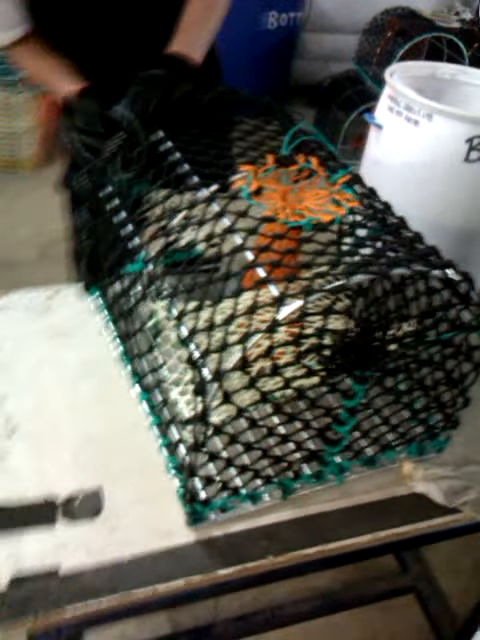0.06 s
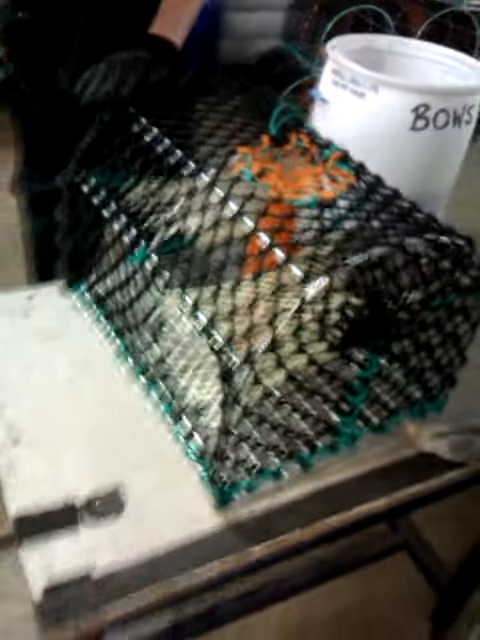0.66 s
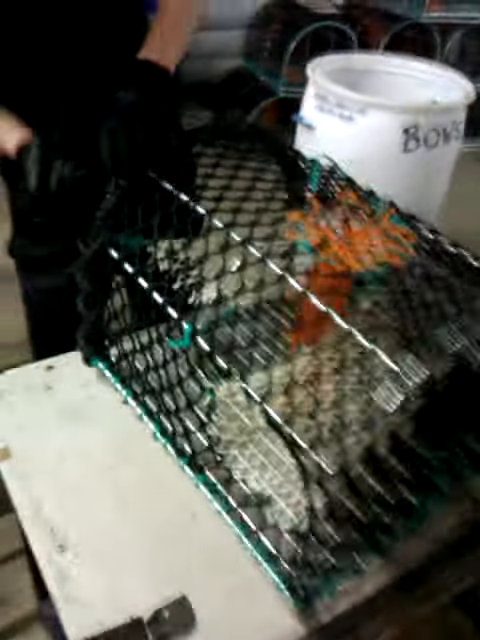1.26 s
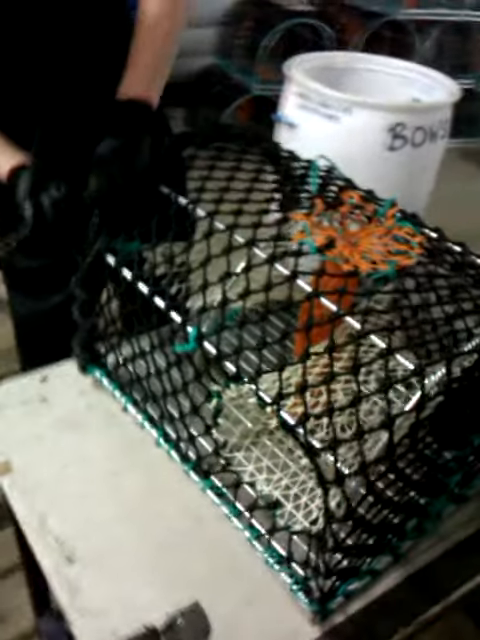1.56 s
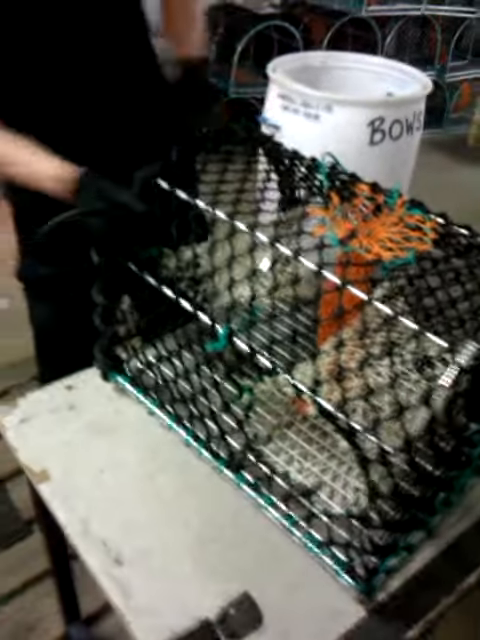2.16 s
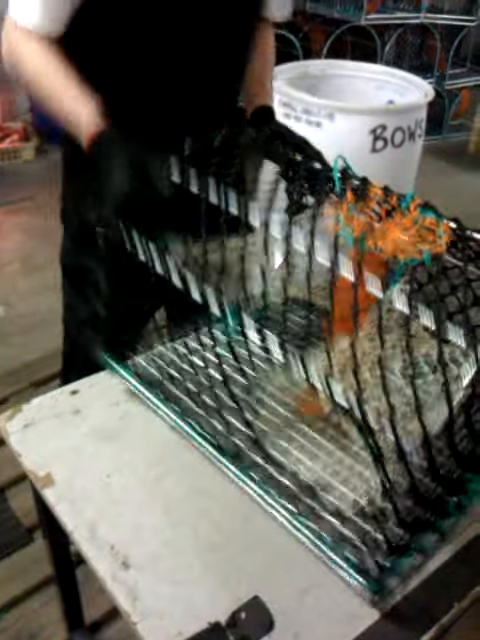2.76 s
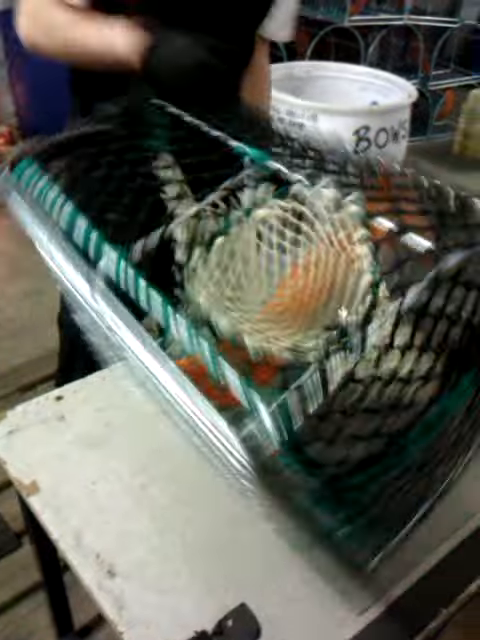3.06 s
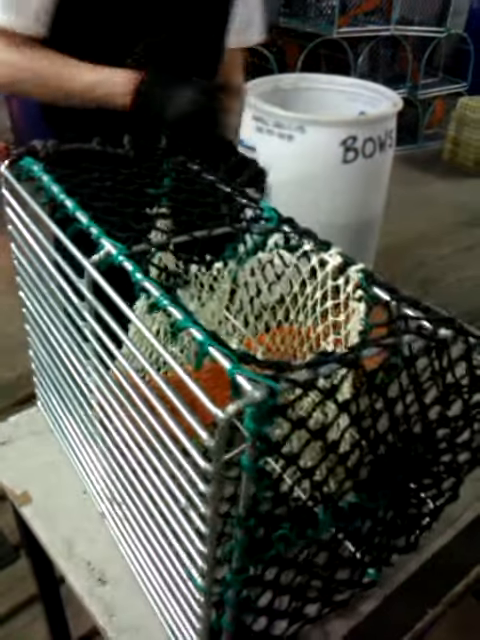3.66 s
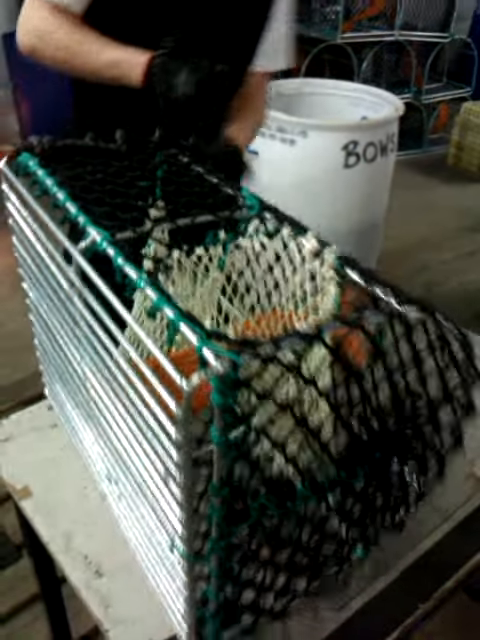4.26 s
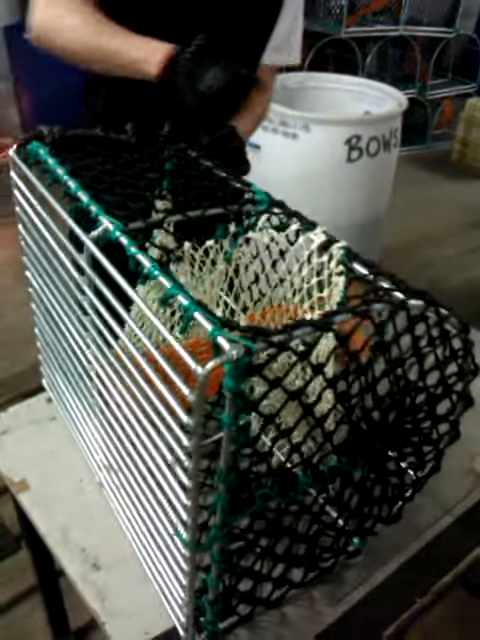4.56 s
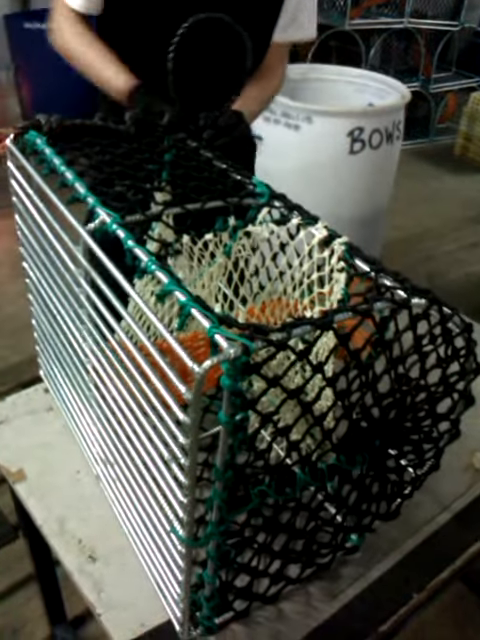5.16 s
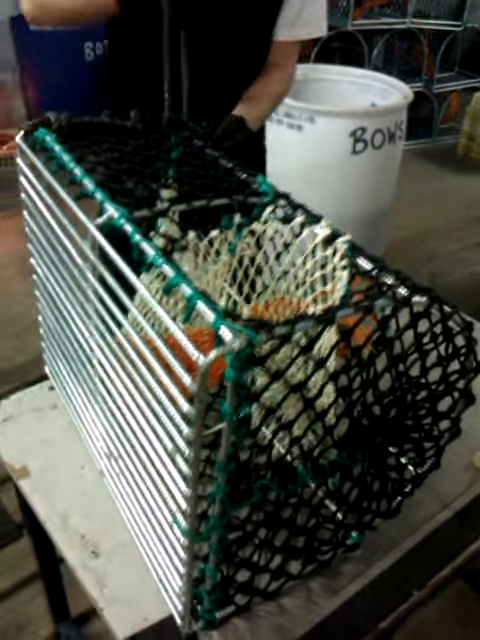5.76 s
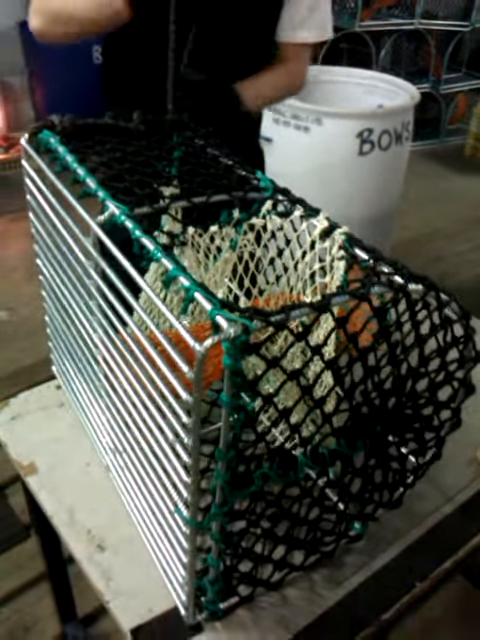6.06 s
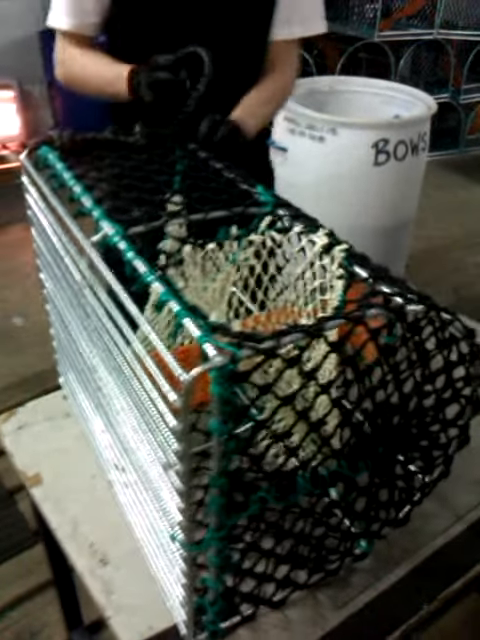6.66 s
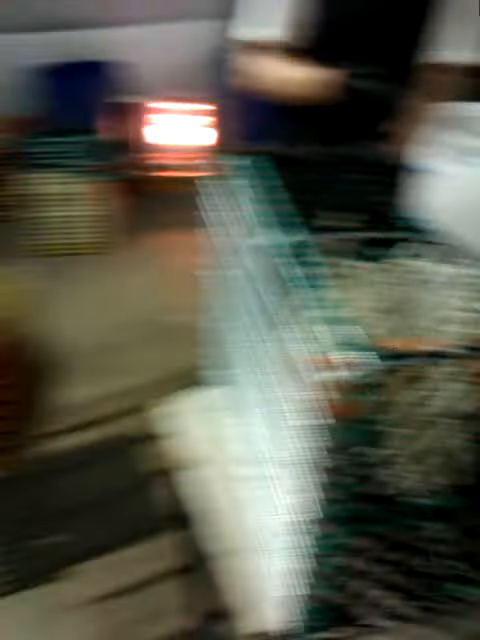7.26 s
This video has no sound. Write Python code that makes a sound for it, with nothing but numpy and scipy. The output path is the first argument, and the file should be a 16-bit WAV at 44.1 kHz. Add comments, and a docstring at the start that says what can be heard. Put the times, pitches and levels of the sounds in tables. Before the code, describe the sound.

A quiet workshop is heard through a hand-held microphone with faint steady hiss, deep rumble and soft, dry handling bumps. For the first two seconds a netted steel trap is shifted on a bench, giving a few dull, hollow knocks. Its netting rustles faintly as it is pulled, and the frame hums in brief low tones. At 2.3 seconds comes a sharper knock with a quick clack of bars. From about 2.8 to 3.4 seconds the trap tips over, scraping along the bench in jerks while loose bars clack and rattle, loudest at 3 seconds, with a short room echo. Light rustling and tiny swishes of twine follow, then a group of knocks around 4.6 to 4.9 seconds. The rumble sinks away and it is nearly still until 6 seconds. Microphone bumps and rumble return at 6.2, with a last group of light knocks from 6.4 to 6.9 seconds.

```python
"""In a quiet workshop, over the hiss, deep rumble and soft, dry bumps of a hand-held microphone,
a netted steel creel is shifted on a bench: its frame knocks, and hums as gloved hands pull the
rustling netting. Around three seconds in it tips over, scraping along the bench top in jerks while
its loose bars clack and rattle. It is set down with two more groups of knocks; the microphone's
rumble sinks away as the hand rests and comes back with the last group."""
import sys
import numpy as np
from scipy import signal
from scipy.fft import rfft, irfft, next_fast_len
from scipy.io import wavfile

SR = 44100
rng = np.random.default_rng(int(sys.argv[2]) if len(sys.argv) > 2 else 0)


def transcribe(u):
    """Save the signal u as a 16-bit wav file named by the first command-line argument.

    u: samples, shape (n,) or (channels, n), limited to [-1, 1]; the rate is SR.
    q: integer samples, one column per channel.
    """
    v = np.clip(np.atleast_2d(u).T, -1, 1)
    q = np.round(v * 32767).astype(np.int16)
    wavfile.write(sys.argv[1], SR, q)


N = 331191
T = np.arange(N) / SR


def undb(db):
    """Decibels to gain."""
    return 10 ** (np.asarray(db) / 20)


def unit(x):
    """Scale to rms 1."""
    return x / np.sqrt(np.mean(x ** 2))


def at(points, hz):
    """Read a table of (Hz, value) on a log-frequency axis."""
    f, value = np.transpose(points)
    return np.interp(np.log(np.maximum(hz, 1)), np.log(f), value)


def colour(x, points):
    """Equalise a sound with a curve of (Hz, dB) points."""
    size = next_fast_len(len(x))
    gain = undb(at(points, np.fft.rfftfreq(size, 1 / SR)))
    return irfft(rfft(x, size) * gain, size)[:len(x)]


def cut(x, hz, kind, order=2):
    """Butterworth filter."""
    sos = signal.butter(order, np.minimum(hz, SR / 2 - 1), kind, fs=SR, output="sos")
    return signal.sosfilt(sos, x)


def fade(t, t60):
    """Exponential decay, 60 dB in t60."""
    return np.exp(-np.log(1000) * t / t60)


def add(track, s, x):
    """Mix a sound in at time s."""
    i = max(int(s * SR), 0)
    track[i:i + len(x)] += x[:N - i]


def swell(s, rise_s, fall_s):
    """A bell-shaped envelope that peaks at time s."""
    return np.exp(-.5 * ((T - s) / np.where(T < s, rise_s, fall_s)) ** 2)


def settling(events, t60, rise_s=0.0055):
    """Envelope of something that each event (s, dB, ..) stirs up and that then comes to rest."""
    power, t = np.zeros(N), T[:SR]
    for s, db, *_ in events:
        add(power, s, (undb(db) * (1 - np.exp(-(t / rise_s) ** 2)) * fade(t, t60)) ** 2)
    return np.sqrt(power)


# The noise floor's tone. Each row: frequency in Hz, gain in dB.
HISS_EQ = [(20, 7.5), (50, -4), (120, -6.5), (300, -10), (600, -14), (1200, -17.5), (2700, -20),
           (6000, -22), (15500, -23.5)]
# Electronic whine. Each row: pitch in Hz, level in dB.
WHINE_TONES = [(11541, -86.5), (15138, -89)]

def hiss(level_db=-59):
    """A steady bed of microphone hiss and room rumble with two thin electronic tones."""
    tones = sum(np.sqrt(2) * undb(db) * np.sin(2 * np.pi * hz * T) for hz, db in WHINE_TONES)
    return undb(level_db) * unit(colour(rng.standard_normal(N), HISS_EQ)) + tones


# The microphone hand follows the creel, rests, moves again. Each row: time in seconds, rumble in dB.
GRIP_LEVELS = [(0, -62), (1, -59), (3.5, -69), (4.4, -75), (5.8, -82), (6.3, -64), (7.5, -61)]

def grip(band_hz=(22, 70), flare_db=-14):
    """Deep rumble carried through the microphone's case follows the hand and flares at each bump."""
    moving = undb(np.interp(T, *np.transpose(GRIP_LEVELS)))
    flares = undb(flare_db) * settling(CASE_BUMPS, t60=0.2)
    return np.hypot(moving, flares) * unit(cut(rng.standard_normal(N), band_hz, "band"))


# Bumps on the microphone. Each row: centre in seconds, peak in dB, pitch in Hz.
CASE_BUMPS = [(0.0474, -33, 172), (0.121, -36.5, 214), (0.145, -35, 92), (0.184, -32, 195),
              (0.228, -32.5, 157), (0.6461, -36.5, 69.4), (0.764, -38, 80), (.862, -44.5, 110),
              (.915, -48, 170), (.974, -36, 128), (0.993, -35, 62), (1.008, -45, 75), (1.048, -33, 48),
              (1.082, -36, 68.5), (1.235, -46, 140), (1.309, -43, 65), (1.675, -37.5, 65.5),
              (1.856, -45.5, 94), (2.140, -43, 100), (2.265, -38.5, 272), (2.5046, -32.5, 79),
              (2.5904, -30.5, 83), (2.893, -32.5, 75), (2.907, -31.5, 70), (3.107, -41, 90),
              (3.4765, -33.5, 146), (3.79, -40, 171), (3.877, -40, 107), (3.948, -41.5, 91.5),
              (6.187, -28.5, 97), (6.207, -48, 45), (6.928, -33, 83.5), (7.0935, -31.5, 173),
              (7.194, -43.5, 116), (7.21, -49, 231)]

def bumps(low_cut_hz=55, case_hz=135, case_t60=0.0079, case_db=-9, soft_hz=1050):
    """Each bump is one soft push and pull on the microphone's case, with a brief low ring."""
    out, t = np.zeros(N), T[:SR // 12]
    case = np.sin(2 * np.pi * case_hz * t) * fade(t, case_t60)
    for s, db, hz in CASE_BUMPS:
        phase = 2 * np.pi * hz * (t - t.mean())
        push = cut(phase / (1 + phase ** 2) ** 2 * np.hanning(len(t)), low_cut_hz, "high", order=1)
        ringing = unit(signal.fftconvolve(push, case)[:len(t)])
        bump = cut(unit(push) + undb(case_db) * ringing, soft_hz, "low")
        add(out, s - t.mean(), undb(db) * bump / np.abs(bump).max())
    return out


# Frame and bench ringing together. Each row: pitch in Hz, level in dB, t60 in seconds.
FRAME_MODES = [(73, -35, 0.56), (77, -19, 0.7), (122.7, -21, 0.47), (151.2, -11, 0.18), (228, -26, 0.77),
               (253, -8, 0.03), (298.5, -13, 0.29), (349.4, -11.5, 0.24), (378, 1, 0.033),
               (490, -11.5, 0.027), (566, -13.5, 0.18), (645, -11.5, 0.046), (708, -18, 0.21),
               (770, -25, 0.19), (814, -10, 0.11), (873, -15.5, 0.11), (948, -20, 0.13), (1035, -35, 0.086),
               (1076, -24.5, 0.15), (1134, -19, 0.21), (1250, -19, 0.21), (1390, -31, 0.12),
               (1466, -36, 0.18), (1430, -18, 0.018), (1566, -36, 0.17), (1665, -18.5, 0.1),
               (1765, -21, 0.19), (1746, -24, 0.12)]
# The crowd of short vibrations in bars and netting. Each row: frequency in Hz, gain in dB.
CLATTER_EQ = [(40, -7), (150, 11), (370, 4.5), (600, -2), (1100, -7.5), (1700, -16.5), (2200, -22),
              (3500, -14.5), (7000, -45), (16000, -56)]

def frame_ring(boom_db, clatter_db, length=1, boom_below_hz=270, clatter_t60=0.23):
    """One blow's ring: each contact point weights the modes anew; bars and netting clatter along."""
    t = T[:int(SR * .6)]
    hz, db, t60 = np.transpose(FRAME_MODES)[:, :, None]
    weight, stretch = rng.standard_normal((2, len(FRAME_MODES), 1))
    polarity = np.where(hz < 2 * boom_below_hz, 1, rng.choice([-1, 1], hz.shape))
    gain = polarity * undb(db + 1.5 * weight + boom_db * (hz < boom_below_hz))
    hz = hz + 2 * stretch  # the load on the frame shifts each mode a little
    t60 = np.where(hz < boom_below_hz, t60, t60 * length)  # a tight grip damps all but the boom
    modes = np.sum(gain * fade(t, t60) * np.sin(2 * np.pi * hz * t), axis=0)
    clatter = unit(colour(rng.standard_normal(len(t)), CLATTER_EQ)) * fade(t, clatter_t60 * length)
    return modes + undb(clatter_db) * clatter


# The frame meets the bench. Each row: start in seconds, level in dB, contact cut-off in Hz, clunk in
# relative dB, clunk pitch in Hz, ring length as a factor (under 1 is held tight), rebound in relative dB.
BENCH_KNOCKS = [(0.147, -44, 760, -11, 370, 0.93, -27), (0.531, -44.5, 715, -4.5, 377, .75, -11.5),
                (1.093, -44.5, 620, -12, 473, 0.82, -24), (1.333, -43, 920, 2.5, 367.5, 0.9, -11),
                (1.386, -51.5, 650, 2.5, 344, 0.46, -24), (2.294, -32.5, 1380, -4, 367, 0.76, -12),
                (2.324, -41, 1600, 2.5, 331, 0.71, -10), (2.584, -43.5, 375, -11, 387, 0.7, -7),
                (2.860, -45, 603, -2, 310, 1.1, -18), (2.886, -48, 517, 0, 390, 0.65, -9),
                (2.986, -40, 1500, -14, 404, 0.42, -19), (3.0287, -32, 2000, -5, 323, 0.62, -8.5),
                (3.164, -40, 1120, -2, 295, 1.5, -18), (3.207, -40, 1250, -3, 304, 0.91, -13),
                (3.244, -43.5, 1000, -5, 290, 1, -12), (3.309, -43, 910, 2, 394, 0.43, -28),
                (3.325, -43, 700, -6.5, 328, 0.48, -33), (3.448, -51, 695, 2, 361, 0.75, -21),
                (4.05, -46, 700, -1.5, 344, 0.72, -9), (4.5995, -39, 840, 1.5, 382, 0.56, -20),
                (4.7528, -42, 1650, 3, 370, 0.94, -8), (4.788, -55, 1500, -6, 384, 0.84, -14),
                (4.928, -49.5, 520, -1, 376, .86, -14), (6.038, -52, 243, -18, 366, .64, -17),
                (6.377, -54.5, 605, -5, 294, 0.82, -10), (6.531, -43, 1110, 2, 360, 0.61, -7.5),
                (6.755, -56.5, 694, -1, 424, 0.44, -18), (6.839, -44.5, 1280, 2, 360, 0.68, -11),
                (6.909, -49, 600, 0, 363, 1.4, -8)]

def knocks(seat_s=0.0023, clunk_s=0.016, rebound_s=0.0262, rebound_boom_db=15):
    """The twine-wrapped frame seats, rings with the bench and rocks back; soft contacts are duller."""
    out, t = np.zeros(N), T[:int(clunk_s * SR)]
    for s, db, contact_hz, clunk_db, clunk_hz, length, rebound_db in BENCH_KNOCKS:
        first_boom_db = 2.5 + 0.49 * (-40.5 - db)  # softer knocks carry a larger share of boom
        contacts = (0, 0, first_boom_db), (rebound_s, rebound_db, rebound_boom_db)
        for late_s, weaker_db, boom_db in contacts:
            blow = frame_ring(boom_db, clatter_db=-1, length=length)
            attack = 1 - np.exp(-T[:len(blow)] / seat_s)
            blow = cut(blow * attack, contact_hz, "low", order=3)
            blow /= blow[:SR // 50].std()  # the first 20 ms set the level
            add(out, s + late_s, undb(db + weaker_db) * blow)
        # hollow clunk: the bench top swings for a few cycles until the frame's weight stops it
        clunk = unit(np.sin(2 * np.pi * clunk_hz * t) * np.sin(np.pi * t / clunk_s))
        add(out, s, undb(db + clunk_db) * clunk)
    return out


# The workshop's reverb. Each row: frequency in Hz, t60 in seconds.
ROOM_DECAY = [(60, 0.65), (160, 0.7), (280, 0.27), (500, 0.026), (1500, 0.51), (4000, 0.78), (12000, 0.14)]

def workshop(x, wet_db=-11, build_s=0.0035):
    """Diffuse echoes build up and die away octave by octave; lows and treble outlast the mids."""
    t, tail = T[:SR], 0
    for hz in 45 * 2. ** np.arange(8):
        band = cut(rng.standard_normal(SR), [hz, 2 * hz], "band", order=3)
        tail = tail + band * fade(t, at(ROOM_DECAY, hz * np.sqrt(2)))
    tail = tail * (1 - np.exp(-(t / build_s) ** 2))
    return undb(wet_db) * signal.fftconvolve(x, tail / np.sqrt(np.sum(tail ** 2)))[:N]


# The netting's dull rustle. Each row: frequency in Hz, gain in dB.
NET_EQ = [(20, -48), (50, -1), (100, 5), (160, 3.5), (260, -4), (400, -11), (700, -20), (1500, -31),
          (4000, -100)]
# Hands pull the netting. Each row: peak time in seconds, strength in dB, half-length in seconds,
# hum pitch in Hz, hum in relative dB.
NET_PULLS = [(.27, -59, 0.073, 241, -10), (0.708, -55.5, 0.018, 236, -12), (0.955, -58.5, 0.08, 120, -18),
             (1.16, -54.5, 0.083, 155, -6), (1.46, -63, 0.056, 151.7, 1), (1.528, -71.5, 0.053, 237.6, 4.5),
             (1.614, -56, 0.019, 124, -9), (1.715, -58.5, 0.03, 124, 0), (2.419, -53.5, 0.055, 124, 4.5),
             (2.53, -70, 0.13, 229.4, 5), (2.864, -49, 0.052, 229.6, -6), (3.568, -52.5, 0.03, 178, -4),
             (4.11, -71, 0.092, 156, 13.5), (4.189, -60.5, 0.043, 125, 0.5), (4.48, -57.5, 0.042, 128, -2),
             (4.572, -51.5, 0.019, 245, -3.5), (4.69, -51, 0.018, 246, 2), (4.866, -65, 0.073, 234, 0),
             (5, -61.5, 0.084, 156, 4), (5.098, -70, 0.048, 239, 5), (5.188, -71.5, 0.029, 128, 10.5),
             (5.476, -63, 0.037, 249, -8.5), (5.802, -67.5, 0.049, 282.5, -0.5),
             (6.662, -58.5, 0.048, 247, -6), (6.995, -53, 0.06, 156, -18), (7.385, -58.5, 0.022, 153, -19)]

def netting(drag, tugs_per_s=200, body_db=-5, rub_db=-4, held_db=-72.5, shake_db=-11.5, drag_db=-4.5):
    """Small tugs on the mesh rustle and stir the frame; pulls, knocks and slides all strain it."""
    pulled = sum(undb(db) * swell(s, half_s, half_s) for s, db, half_s, *_ in NET_PULLS)
    shaken = undb(shake_db) * settling(BENCH_KNOCKS, t60=0.54)
    strain = np.sqrt(undb(held_db) ** 2 + pulled ** 2 + shaken ** 2 + (undb(drag_db) * drag) ** 2)
    tugs = (rng.random(N) < tugs_per_s / SR) * rng.uniform(-0.86, 1, N)
    rub = unit(colour(tugs, NET_EQ))
    body = unit(signal.fftconvolve(rub, frame_ring(boom_db=-6.5, clatter_db=-6))[:N])
    return strain * (undb(rub_db) * rub + undb(body_db) * body)


def hums(waver_hz=6):
    """Under each pull the hollow frame hums on one low note, wavering as the strain changes."""
    out, t = np.zeros(N), T[:SR]
    for s, db, half_s, hz, hum_db in NET_PULLS:
        waver = np.interp(t, np.linspace(0, 1, 20), rng.uniform(-1.007, 1, 20))
        note = np.sqrt(2) * np.sin(2 * np.pi * np.cumsum(hz + waver_hz * waver) / SR)
        add(out, s - .5, undb(db + hum_db) * note * np.exp(-.5 * ((t - .5) / half_s) ** 2))
    return out


# Twine slides through the mesh. Each row: peak time in seconds, level in dB, band centre in Hz,
# half-length in seconds.
TWINE_SWISHES = [(0.572, -72, 12000, .04), (1.349, -71, 1920, .014), (1.739, -66, 1510, 0.012),
                 (2.614, -66, 860, 0.014), (3.126, -57.5, 9200, 0.0073), (3.947, -63, 1130, 0.0072),
                 (4.567, -62, 880, 0.014), (4.671, -62, 1110, 0.016), (4.945, -66, 950, .012),
                 (5.347, -65, 11600, .03), (5.789, -67, 1000, 0.011), (6.278, -70, 1090, 0.028),
                 (6.93, -71, 1200, 0.014), (7.466, -71, 1500, 0.011)]

def swishes(band_ratio=1.33):
    """Short swells of friction as twine and gloves slide."""
    out, t = np.zeros(N), T[:SR // 2]
    for s, db, hz, half_s in TWINE_SWISHES:
        friction = unit(cut(rng.standard_normal(len(t)), [hz / band_ratio, hz * band_ratio], "band"))
        add(out, s - t.mean(), undb(db) * friction * np.exp(-.5 * ((t - t.mean()) / half_s) ** 2))
    return out


# The ring of one steel bar. Each row: pitch in Hz, level in dB, t60 in seconds.
BAR_MODES = [(705, 10.5, 0.14), (1030, 17.5, 0.046), (1339, -1.5, 0.22), (1498, 9, 0.1), (1759, 12, 0.037),
             (2140, -8, 0.3), (2234, -1, 0.24), (2506, -1.5, 0.19), (2890, -5.5, 0.17), (3104, -3, 0.094),
             (3330, -22, 0.16), (3750, -14, 0.096), (5360, -29, 0.11)]

def bar(detune=0.0238, spread_db=4):
    """One bar struck somewhere along its length: each has its own tuning and mix of modes."""
    t = T[:SR // 3]
    hz, db, t60 = np.transpose(BAR_MODES)[:, :, None]
    weight, stretch = rng.standard_normal((2, len(BAR_MODES), 1))
    gain = rng.choice([-1, 1], hz.shape) * undb(db + spread_db * weight)
    hz = hz * (1 + detune * stretch)
    return unit(np.sum(gain * fade(t, t60) * np.sin(2 * np.pi * hz * t), axis=0))


# The crack of bar on bar. Each row: frequency in Hz, gain in dB.
CRACK_EQ = [(200, -24), (600, 30), (1200, -1.5), (1900, -7), (3500, 1), (6000, -30), (12000, -50)]
# Loose bars clack as the frame is jolted, drops and tips. Each row: start in seconds, peak in dB,
# twine cut-off in Hz, tick in relative dB, t60 of the crack in seconds.
BAR_CLACKS = [(1.343, -49.5, 2400, -32, 0.021), (2.2945, -39, 1900, -37, .014),
              (2.3, -32.5, 3400, -35, 0.01), (2.309, -43, 3400, -31, .016),
              (2.3212, -32, 3180, -32, 0.0057), (2.329, -42, 3400, -31, .016),
              (2.341, -43, 2600, -34, 0.018), (2.851, -46, 4000, -9, 0.017),
              (2.861, -37.5, 4000, -24, 0.0059), (2.901, -38, 3400, -24, 0.018),
              (2.924, -40, 4000, -21, .014), (2.951, -44, 3000, -27, .012), (2.9866, -35, 2220, -26, .018),
              (3.0275, -23.5, 4000, -24, 0.0098), (3.054, -30, 3000, -34, 0.019),
              (3.0604, -27.5, 3400, -36, 0.017), (3.077, -29, 2600, -28, 0.018),
              (3.094, -43, 2600, -28, 0.014), (3.130, -32.5, 4000, -18, .014),
              (3.1717, -37, 2600, -29, 0.019), (3.209, -43, 2200, -30, .018),
              (3.246, -46, 2400, -30, 0.014), (4.6035, -36, 840, -40, .035), (4.7635, -45, 2300, -32, .014),
              (4.789, -50, 2800, -26, .016), (6.538, -43, 1100, -40, 0.023)]

def clacks(ring_db=-2, damp_t60=0.13, tick_t60=0.013, tick_hz=4200, bar_count=3):
    """Bars meet with a crack and a metallic ring, both softened by twine; bare steel adds a tick."""
    out, t = np.zeros(N), T[:SR // 3]
    tick_band = [tick_hz / np.sqrt(2), tick_hz * np.sqrt(2)]
    for s, db, twine_hz, tick_db, crack_t60 in BAR_CLACKS:
        crack = colour(rng.standard_normal(len(t)), CRACK_EQ) * fade(t, crack_t60)
        bars = sum(bar() for _ in range(bar_count)) * fade(t, damp_t60)
        clack = cut(unit(crack) + undb(ring_db) * unit(bars), twine_hz, "low")
        tick = cut(rng.standard_normal(len(t)) * fade(t, tick_t60), tick_band, "band")
        add(out, s, undb(db) * (clack / np.abs(clack).max() + undb(tick_db) * tick / np.abs(tick).max()))
    return out


# The tipping frame slides over the bench in jerks. Each row: peak time in seconds, level in dB,
# rise in seconds, fall in seconds, grit in relative dB.
BENCH_SLIDES = [(2.83, -65.5, 0.052, 0.015, -10), (2.856, -53.5, 0.011, 0.13, -8.5),
                (2.93, -53, 0.0076, 0.074, -10), (2.991, -54, 0.0069, 0.026, -10),
                (3.066, -44, 0.035, 0.049, -22), (3.129, -54, 0.022, 0.021, 0.5),
                (3.17, -47.5, 0.017, 0.027, -33), (3.252, -47.5, 0.004, 0.0057, -27),
                (3.33, -57.5, 0.035, 0.013, -12)]

def sliding():
    """Envelopes of the scrape and of its grit: each slide gathers speed and slows again."""
    drag, grit = 0, 0
    for s, db, rise_s, fall_s, grit_db in BENCH_SLIDES:
        push = undb(db) * swell(s, rise_s, fall_s)
        drag += push
        grit += push * undb(grit_db)
    return drag, grit


# The tone of the scrape and of its grit. Each row: frequency in Hz, gain in dB.
SCRAPE_EQ = [(100, -23), (200, -29), (290, -4), (400, 5), (600, -0.5), (1100, 10.5), (1700, 5), (2100, 21),
             (2700, 8), (4000, 11), (8000, -10)]
GRIT_EQ = [(800, -23), (1800, 1.5), (2600, 2.5), (4200, -4.5), (6000, -6.5), (10000, -31), (16000, -23)]

def scrape(drag, grit, slips_per_s=1000, spread_db=3, contacts=3):
    """Dense, uneven slips ring the frame differently at each contact point and throw off fine grit."""
    ringing, dust = 0, 0
    for _ in range(contacts):
        size = undb(spread_db * np.clip(rng.standard_normal(N), -2, 2))
        slips = (rng.random(N) < slips_per_s / contacts / SR) * rng.choice([-1, 1], N) * size
        ringing += signal.oaconvolve(slips, frame_ring(boom_db=0, clatter_db=-14))[:N]
        dust += slips
    return drag * unit(colour(ringing, SCRAPE_EQ)) + grit * unit(colour(dust, GRIT_EQ))


def rattle(drag, relative_db=-4.5, taps_per_s=22, spread_db=6, bar_count=8):
    """While the frame drags, its bars chatter one by one and ring on."""
    out = 0
    for _ in range(bar_count):
        taps = (rng.random(N) < taps_per_s / SR) * undb(spread_db * rng.uniform(-0.9, 1, N))
        out += signal.oaconvolve(taps * drag, bar())[:N]
    return undb(relative_db) * drag.std() * unit(out)


def scene():
    """The creel's contacts echo in the room; netting, hums and the microphone's noises stay dry."""
    drag, grit = sliding()
    creel = knocks() + clacks() + scrape(drag, grit) + rattle(drag) + swishes()
    return (creel + workshop(creel) + netting(drag) + hums() + bumps() + grip() + hiss())[None]


def record(dry, top_hz=15800):
    """A steep low-pass takes off the very top."""
    return signal.sosfilt(signal.ellip(12, .1, 70, top_hz, fs=SR, output="sos"), dry)


dry = scene()
out = record(dry)
transcribe(out)
```